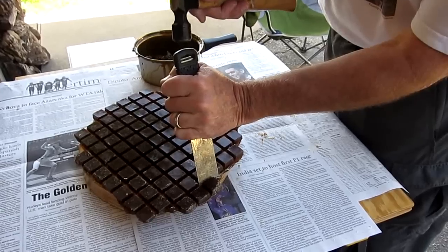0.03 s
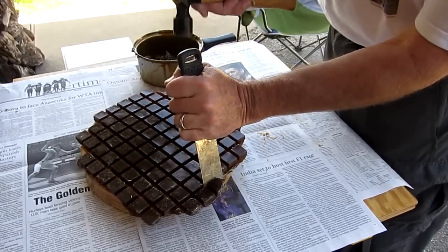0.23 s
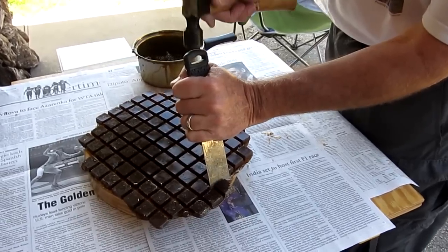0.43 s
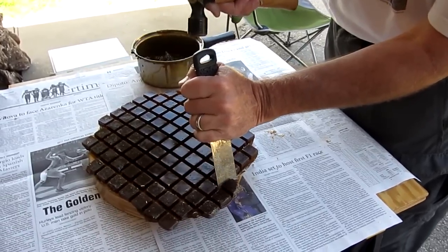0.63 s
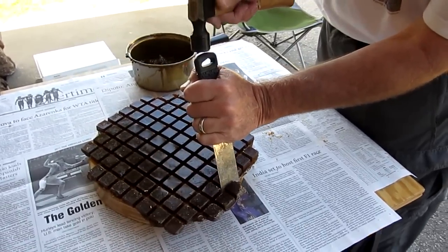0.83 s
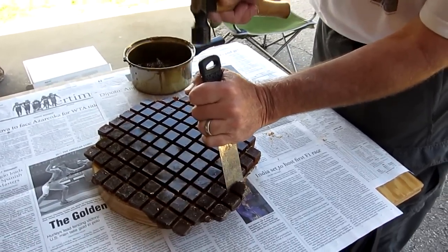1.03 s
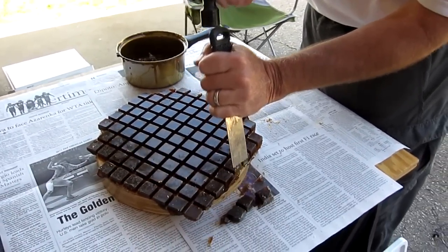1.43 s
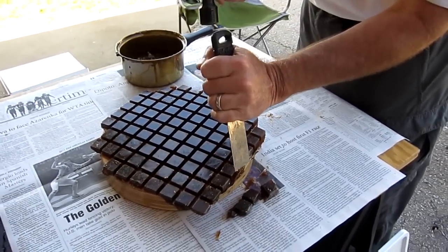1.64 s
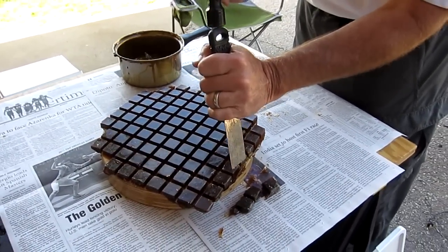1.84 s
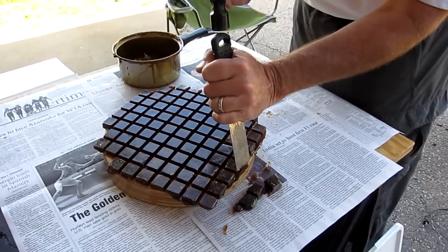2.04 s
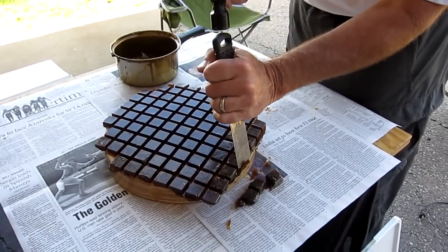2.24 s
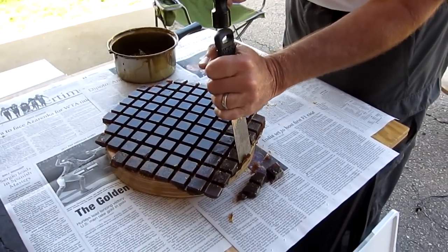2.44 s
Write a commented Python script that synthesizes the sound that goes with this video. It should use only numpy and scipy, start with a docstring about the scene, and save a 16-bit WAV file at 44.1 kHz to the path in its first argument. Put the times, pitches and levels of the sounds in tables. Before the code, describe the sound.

A hammer knocks a steel blade into a brittle slab four times, close by: dull at 0.2 seconds, sharp at 0.5, dull at 0.9, and a sharp crack at 1.1. Chunks clatter onto the paper-covered table around 1.2, and crumbs patter until 1.5. A very faint, distant chirp follows, with a tick near 1.9. The blade scrapes softly and taps down around 2.5. Soft outdoor air and low hum continue underneath.

```python
"""Outdoors, over soft air and a low hum, a hammer drives a steel blade into a slab of hard pitch
on a newspaper-covered table. Four blows make blade, slab and table ring: dull when the slab holds,
sharp when it cracks. The last frees chunks that clatter onto the paper. Crumbs patter and settle,
something chirps faintly far off, and the blade is scraped back into place and set on the slab."""
import sys
import numpy as np
from scipy import signal
from scipy.fft import rfft, irfft
from scipy.io import wavfile

SR = 44100
rng = np.random.default_rng(int(sys.argv[2]) if len(sys.argv) > 2 else 0)


def unload_audio(sound):
    """Save the sound as a 16-bit wav file, at the path given as the first command line argument."""
    columns = np.transpose(np.atleast_2d(sound))
    # keep every value between -1 and 1, then stretch to whole-number steps
    steps = np.round(np.clip(columns, -1, 1) * 32767)
    wavfile.write(sys.argv[1], SR, steps.astype(np.int16))


N = 114660
TIME = np.arange(N) / SR
AGE = TIME[:SR // 2]  # seconds since a hit
TOP_HZ = 11200

# A spectrum sets only the balance of low and high. A fade (t60) is the time to drop by 60 dB.
# how alike left and right are (1 = the same), for the air and the work: f/Hz, likeness
AIR_LIKENESS = [(60, 0.65), (170, 0.59), (470, 0.24), (1340, -0.17), (3760, -0.35), (10600, 0.04)]
WORK_LIKENESS = [(30, .6), (100, 1), (500, 0.99), (1000, 0.97), (2000, 0.42), (4000, 0.52), (9000, 0.83)]
# outdoor air and a narrow, distant whirr: f/Hz, level/dB
AIR_SPECTRUM = [(15, -55), (25, -16), (101, -3), (202, -5), (267, -2.5), (296, -5.5), (391, -8),
                (1550, -12.5), (3000, -16.5), (3770, -15.5), (4630, -19), (7320, -26.5), (11000, -76.5),
                (14300, -72), (22000, -120)]
WHIRR_SPECTRUM = [(1300, -35), (1550, -1), (1800, -41.5)]
# the air swells and sinks: t/s, level/dB
AIR_LEVEL = [(0, -49), (.18, -47.5), (.42, -50), (.7, -55), (1.05, -52), (1.42, -57.5), (1.8, -54.5),
             (2.3, -54.5), (2.6, -49)]
# tones of the hum: f/Hz, first level/dB, later level/dB
HUM_TONES = [(106, -56, -66.5), (200.8, -50, -66.5), (293.6, -65, -71)]
# crumbs and splinters tick: t/s, level/dB, low edge/Hz
CRUMB_HITS = [(.154, -23, 9000), (.3155, -30.5, 6500), (.603, -36, 7500), (.759, -38, 1500),
              (1.3155, -37.5, 5370), (1.3533, -35.5, 4660), (1.3660, -33, 6150), (1.3732, -28.5, 5940),
              (1.4192, -42.5, 4040), (1.451, -55, 5000), (1.4800, -38.5, 915), (1.4970, -43, 890),
              (1.5020, -37, 880), (1.8888, -33, 2800), (1.8895, -35.5, 600), (2.163, -52, 1200)]
# a crumb's tick: f/Hz, level/dB
CRUMB_SPECTRUM = [(500, 18), (2000, 8.5), (3800, 10.5), (5500, 2), (8500, 2.5), (11000, -21.5)]
# hammer blows: t/s, knock/dB, extra bass/dB, knock's top edge/Hz, blade/dB, crack/dB,
# splinter/dB, top edge of steel and crack/Hz, echo/dB
BLOWS = [(.2060, -9.5, 8, 1240, -39, -22, -14.5, 9000, -22),
         (0.478, -9.5, 0.5, 2560, -22.5, -11, -5.5, 9720, -21),
         (0.8589, -13.5, 10, 1350, -35, -16, -15.5, 8940, -26),
         (1.1467, -12.5, -3.5, 2920, -22.5, -9, -2.5, 11000, -20.5)]
# ringing tones of the slab with its table, and of the blade: f/Hz, level/dB, fade/s
SLAB_TONES = [(117, -19, .12), (183, -8.5, .075), (298.4, -0.5, 0.075), (304.4, -15.5, 0.2),
              (343, -30.5, 0.29), (391, -9.5, 0.043), (567, -16.5, 0.098), (663, -12, .045),
              (880.4, -0.5, 0.053), (1010, -12.5, 0.067), (1137.5, -0.5, 0.028), (1498, -5, .04),
              (1660, 0.5, 0.037), (1797, -13, 0.051)]
BLADE_TONES = [(2313, -14, 0.31), (2656, -8, 0.012), (3020, 3.5, 0.019), (3830, 2.5, 0.015),
               (4150, 2.5, .035), (4530, 6.5, .022), (5695, -0.5, 0.019), (6270, -28.5, 0.054),
               (6700, 9, 0.015), (8670, -17.5, 0.06)]
# hammer head's shimmer, crack, first splintering, echo of the surroundings: f/Hz, level/dB
HAMMER_SPECTRUM = [(7000, -34.5), (7650, -12.5), (7830, 0), (8300, -12), (9300, -19), (9900, -48)]
CRACK_SPECTRUM = [(150, -10.5), (500, -14.5), (1200, 5.5), (2800, 13.5), (4500, -10), (7000, -6),
                  (9500, -9.5), (11000, -22.5)]
SPLINTER_SPECTRUM = [(1000, -9.5), (3000, 0), (5200, -2), (7500, -8.5), (9300, -1.5), (11000, -5.5)]
ECHO_SPECTRUM = [(60, -41), (120, -16), (185, -17.5), (300, -3.5), (460, -23.5), (700, -17.5), (880, -12.5),
                 (1300, -21), (1650, -23.5), (3000, -25.5), (6000, -30.5), (10000, -45.5)]
# chunks land: t/s, level/dB, top edge/Hz
CHUNK_HITS = [(.2275, -46, 3000), (0.2393, -44, 3400), (.2585, -36.5, 3180), (0.26, -71, 3400),
              (.3003, -45.5, 3400), (1.1922, -18, 3840), (1.2162, -24.5, 4400), (1.2258, -22, 10500),
              (1.2332, -26, 5100), (1.2395, -24, 3900), (1.2530, -28.5, 3600), (1.2802, -33.5, 3150)]
# a clack on paper: f/Hz, level/dB
CHUNK_SPECTRUM = [(100, -34.5), (200, -23.5), (300, -16.5), (500, 2), (900, 3.5), (2100, 2.5), (3500, -3.5),
                  (6000, -8.5), (9000, -17.5), (11000, -21.5)]
# grit tumbles and fine crumbs patter: t/s, level/dB
TUMBLE_LEVEL = [(1.15, -22.5), (1.18, -39), (1.205, -38), (1.225, -22.5), (1.25, -42), (1.285, -48.5),
                (1.32, -52.5), (1.36, -67)]
PATTER_LEVEL = [(1.17, -46), (1.225, -39), (1.29, -61), (1.36, -41), (1.41, -53.5), (1.47, -75.5),
                (1.53, -99)]
# path of the far chirp: t/s, f/Hz, level/dB
CHIRP_PATH = [(1.59, 4340, -68), (1.69, 4250, -72), (1.731, 4080, -69), (1.757, 3860, -57.5),
              (1.809, 3620, -70), (1.87, 3600, -69.5), (1.935, 3500, -60.5), (1.968, 3600, -80.5)]
# the blade scrapes: t/s, level/dB
SCRAPE_LEVEL = [(2.2, -56.5), (2.38, -63), (2.425, -49.5), (2.46, -46), (2.51, -47), (2.6, -47.5)]
# the blade is set on the slab: t/s, level/dB, low edge/Hz
TOUCH_HITS = [(2.4752, -27.5, 91.5)]
# that scrape and that touch: f/Hz, level/dB
SCRAPE_SPECTRUM = [(100, -2), (250, -19), (500, -2.5), (1000, 1.5), (1500, -3), (3000, -7.5), (6200, -11.5),
                   (8500, -22), (11000, -76.5)]
TOUCH_SPECTRUM = [(100, -4.5), (200, -1), (400, -3), (850, 5), (1500, -1), (3000, 0), (5000, -4.5),
                  (8500, -11), (11000, -48)]


def from_db(db):
    """Turn decibels into a number to multiply by."""
    return 10 ** (np.asarray(db) / 20)


def at_hz(points, hz):
    """Read between a table's rows, giving each octave equal room."""
    row_hz, values = np.transpose(points)
    return np.interp(np.log(hz), np.log(row_hz), values)


def level(rows):
    """Loudness over time, from rows of t/s, level/dB."""
    return from_db(np.interp(TIME, *np.transpose(rows)))


def keep(x, hz, kind, order=2):
    """Keep the "low" or "high" side of hz; a higher order cuts more steeply."""
    sos = signal.butter(order, np.clip(hz, 10, .45 * SR), kind, fs=SR, output="sos")
    return signal.sosfilt(sos, x + 1e-18)


def add(out, s, x):
    """Mix a sound in at s seconds."""
    i = int(s * SR)
    out[:, i:i + x.shape[-1]] += x[..., :N - i]


def noise(spectrum, likeness=WORK_LIKENESS, size=N):
    """Stereo noise of strength 1, shaped by a spectrum."""
    hz = np.maximum(np.fft.rfftfreq(size, 1 / SR), 1)
    white = rfft(rng.standard_normal((2, size)))
    shared, opposed = white * from_db(at_hz(spectrum, hz)) * (hz < TOP_HZ)
    alike = np.clip(at_hz(likeness, hz), -1, 1)
    x = irfft(np.sqrt(1 + alike) * shared + np.sqrt(1 - alike) * opposed * [[1], [-1]], size)
    return x / x.std()


def waver(hz):
    """A random wobble of strength 1, mostly slower than hz."""
    slow = keep(rng.standard_normal(N), hz, "low")
    return slow / slow.std()


def fade(t60):
    """Die away by 60 dB every t60 seconds."""
    return np.exp(-np.log(1000) * AGE / t60)


def rise(s):
    """Grow from 0 towards 1, about two thirds of the way in s seconds."""
    return 1 - np.exp(-AGE / s)


def burst(spectrum, shape):
    """A short noise whose loudness follows a shape."""
    return noise(spectrum, size=len(AGE)) * shape


def ring(tones, gains, lag_s):
    """The fading tones of a struck object, heard slightly later on the right."""
    age = np.maximum(AGE - np.array([[0], [lag_s]]), 0)
    return sum(gain * from_db(db) * fade(t60) * np.sin(2 * np.pi * hz * age) * (-1) ** k
               for k, ((hz, db, t60), gain) in enumerate(zip(tones, gains)))


def grains(levels, spectrum, per_s, spread_db, t60):
    """Many tiny random contacts, each a quickly fading puff of noise."""
    hits = rng.random(N) < per_s / SR
    clicks = hits * from_db(spread_db * np.minimum(rng.exponential(1, N), 4))
    shape = signal.lfilter([1], [1, -np.exp(-np.log(1000) / (t60 * SR))], clicks + 1e-18)
    shape /= np.sqrt(np.mean(shape ** 2))
    return level(levels) * (TIME > levels[0][0]) * noise(spectrum) * shape


def air():
    """The soft rush of outdoor air, with a faint whirr far away."""
    rush = level(AIR_LEVEL) * noise(AIR_SPECTRUM, AIR_LIKENESS)
    whirr = from_db(-65.5) * noise(WHIRR_SPECTRUM, AIR_LIKENESS)
    return keep(rush + whirr, 7750, "low", order=10)


def hum(settle_s=0.95):
    """Three low, wavering tones sink to a quieter level and stay there."""
    out = np.zeros(N)
    for hz, first_db, later_db in HUM_TONES:
        gain = level([(0, first_db), (settle_s, later_db)])
        out += gain * np.sqrt(2) * np.sin(2 * np.pi * hz * TIME + 0.44 * waver(6))
    return out


def ticks(hits, spectrum, t60):
    """Small dry contacts; the smaller the piece, the fewer low notes it has."""
    out = np.zeros((2, N))
    for s, db, low_hz in hits:
        add(out, s, from_db(db) * keep(burst(spectrum, fade(t60)), low_hz, "high", order=4))
    return out


def blows(bass_hz=730, lead_s=.0006):
    """Steel rings, the slab cracks, slab and table knock; a hard contact is brighter, with less bass."""
    out, hz = np.zeros((2, N)), np.array(SLAB_TONES)[:, 0]
    for s, knock_db, bass_db, contact_hz, blade_db, crack_db, splinter_db, top_hz, echo_db in BLOWS:
        blade_gains = from_db(blade_db + 1.5 * rng.standard_normal(len(BLADE_TONES)))
        blade = ring(BLADE_TONES, blade_gains, lag_s=.000008)
        hammer = from_db(-48.5) * burst(HAMMER_SPECTRUM, fade(0.22))
        crack = from_db(crack_db) * burst(CRACK_SPECTRUM, fade(0.023))
        splinter = from_db(splinter_db) * burst(SPLINTER_SPECTRUM, fade(0.0083))
        strike = (blade + hammer + crack + splinter) * rise(0.00024)
        add(out, s - lead_s, keep(strike, top_hz, "low", order=16))

        knock_gains = from_db(knock_db + bass_db / (1 + (hz / bass_hz) ** 4))
        knock_gains /= np.sqrt(1 + (hz / contact_hz) ** 14)  # a soft contact barely stirs high tones
        add(out, s, ring(SLAB_TONES, knock_gains, lag_s=.00002) * rise(0.00056))

        echo = burst(ECHO_SPECTRUM, fade(0.18) * rise(0.0021))
        echo += (from_db(bass_db) - 1) * keep(echo, bass_hz, "low", order=1)
        add(out, s, from_db(echo_db) * keep(echo, 1.4 * contact_hz, "low", order=1))
    return out


def chunks(snap_s=.00008, table_hz=306):
    """Each chunk lands with one sharp push of air, a papery clack and a faint ring of the table."""
    out = np.zeros((2, N))
    snap_time = AGE / snap_s - 3
    snap = -2 * from_db(13) * snap_time * np.exp(-snap_time ** 2)
    table = from_db(-21) * fade(.22) * np.sin(2 * np.pi * table_hz * AGE)
    for s, db, top_hz in CHUNK_HITS:
        clack = burst(CHUNK_SPECTRUM, fade(.028) + from_db(-12) * fade(.14))
        landing = keep(clack + snap, 490, "high")
        add(out, s, from_db(db) * (table + keep(landing, top_hz, "low", order=5)))
    return out


def tumble():
    """Grit from the last blow tumbles over the paper."""
    grit = grains(TUMBLE_LEVEL, CHUNK_SPECTRUM, per_s=1800, spread_db=3, t60=0.0022)
    return keep(grit, 170, "high")


def patter():
    """Fine crumbs land on the paper with tiny, high ticks."""
    crumbs = grains(PATTER_LEVEL, CRUMB_SPECTRUM, per_s=350, spread_db=4, t60=0.006)
    return keep(crumbs, 5500, "high", order=4)


def chirp():
    """One faint, far tone trembles as it slides down."""
    s, hz, db = np.transpose(CHIRP_PATH)
    phase = 2 * np.pi * np.cumsum(np.interp(TIME, s, hz)) / SR + 1.1 * waver(44)
    gain = from_db(np.interp(TIME, s, db)) * (TIME > s[0]) * (TIME < s[-1])
    return np.sqrt(2) * gain * np.sin(phase)


def scrape():
    """The blade drags over the slab; its many tiny contacts blur into a rasp."""
    return grains(SCRAPE_LEVEL, SCRAPE_SPECTRUM, per_s=3000, spread_db=2, t60=0.044)


def scene():
    """The work on the table, just right of centre, with air, hum and chirp around it."""
    work = ticks(CRUMB_HITS, CRUMB_SPECTRUM, t60=.011) + blows() + chunks() + tumble() + patter()
    work += scrape() + ticks(TOUCH_HITS, TOUCH_SPECTRUM, t60=0.055)
    return air() + hum() + work * from_db([[-.55], [.55]]) + chirp()


def record(dry):
    """Flatten the loudest peaks, then remove the highest treble."""
    treble_cut = signal.cheby2(10, 45, TOP_HZ + 500, fs=SR, output="sos")
    return signal.sosfiltfilt(treble_cut, np.clip(dry, -.88, .88))


dry = scene()
out = record(dry)
unload_audio(out)
```